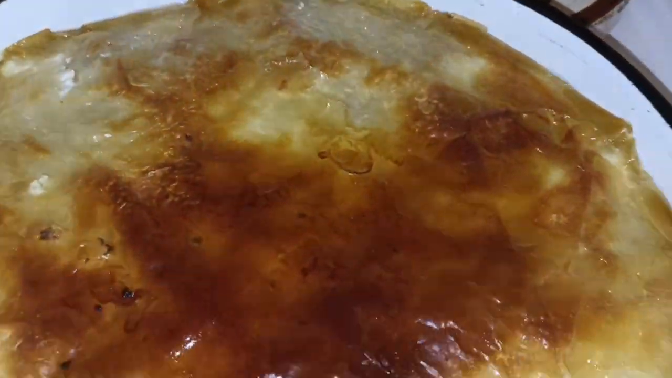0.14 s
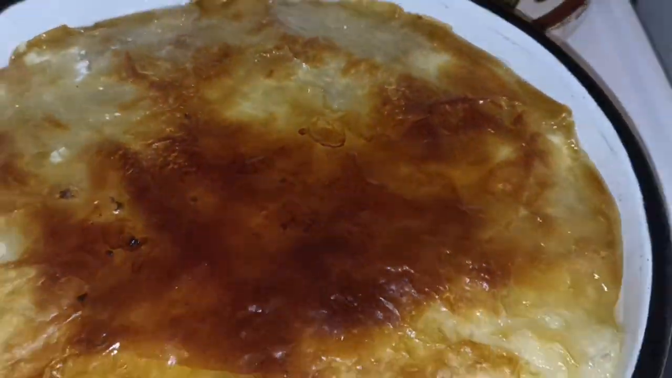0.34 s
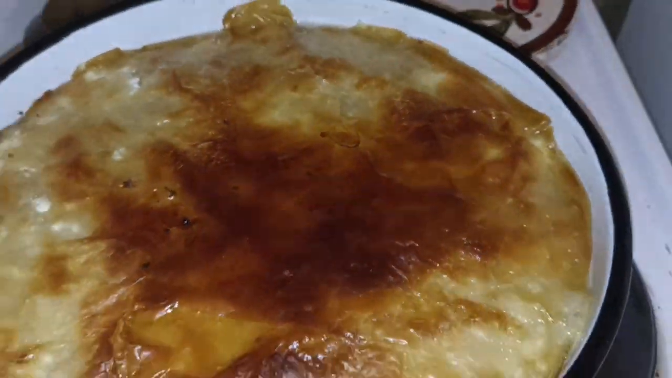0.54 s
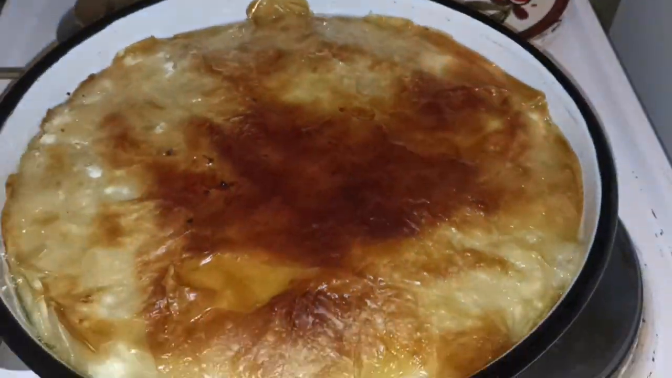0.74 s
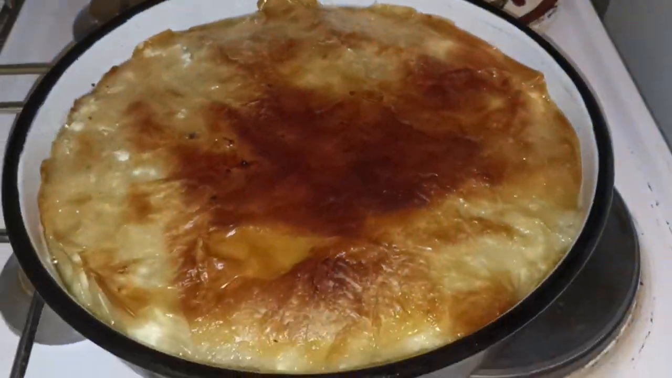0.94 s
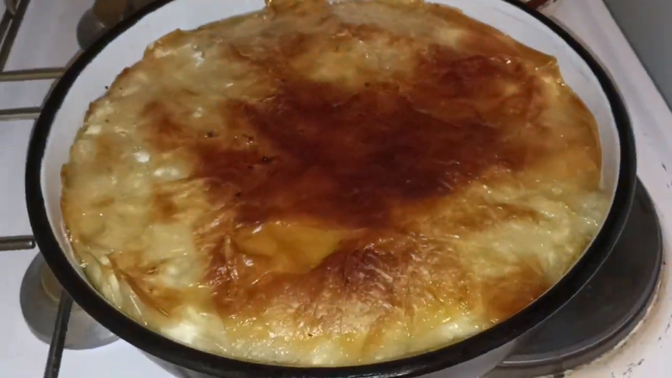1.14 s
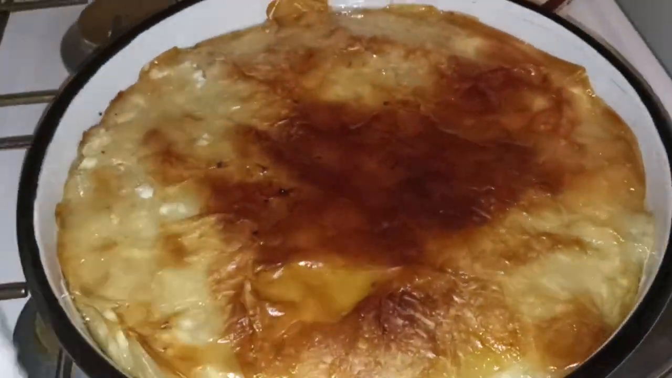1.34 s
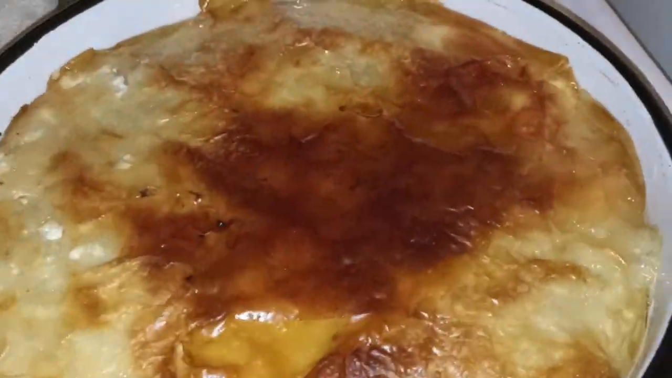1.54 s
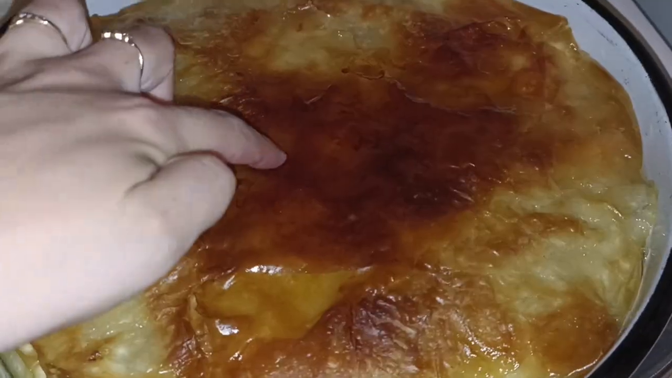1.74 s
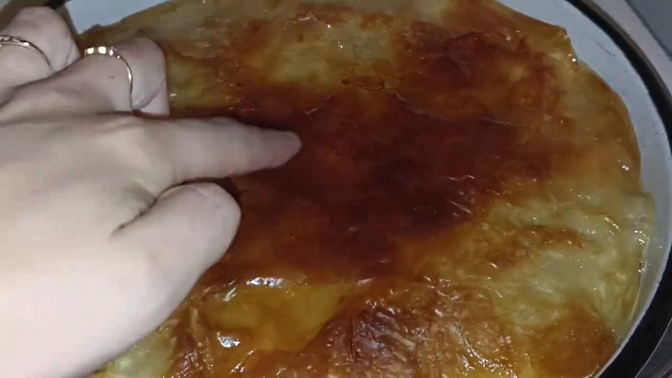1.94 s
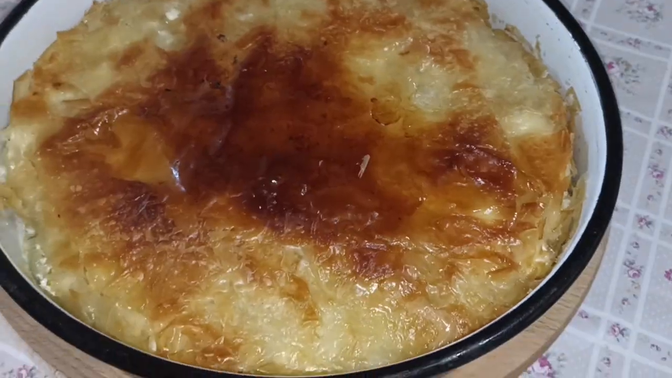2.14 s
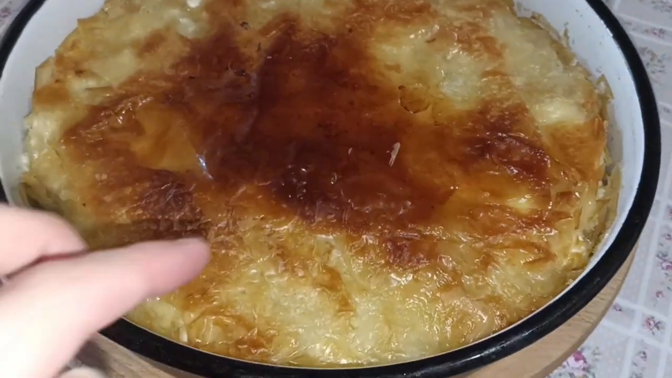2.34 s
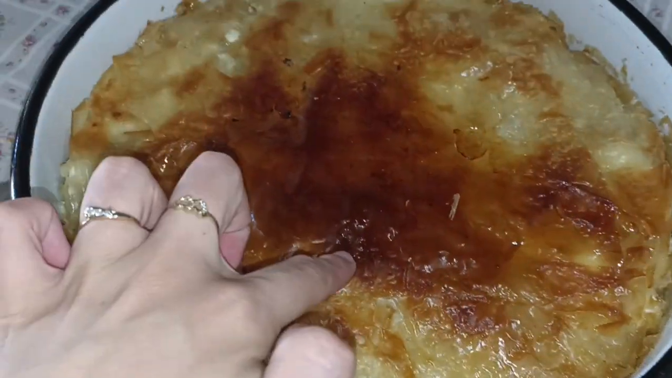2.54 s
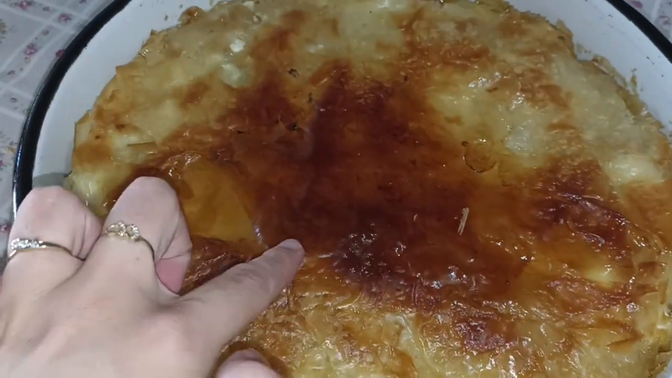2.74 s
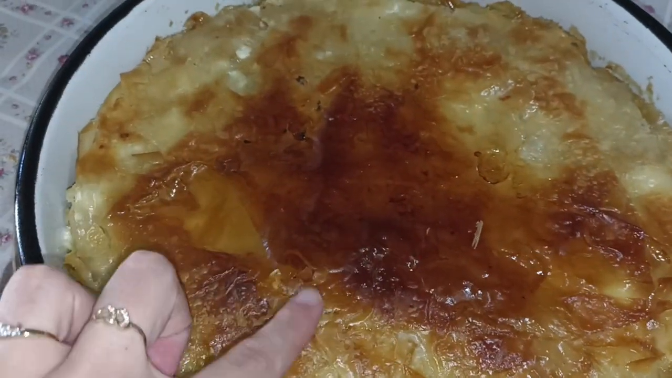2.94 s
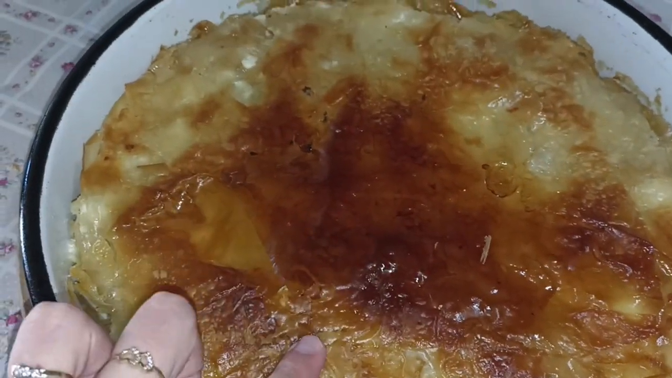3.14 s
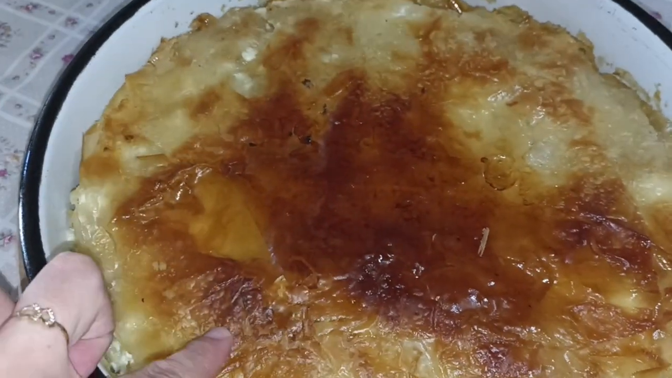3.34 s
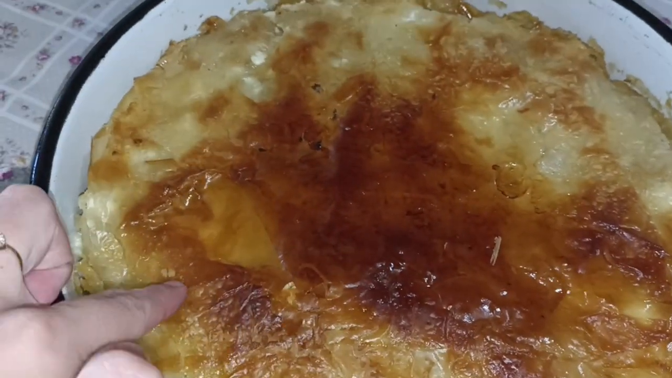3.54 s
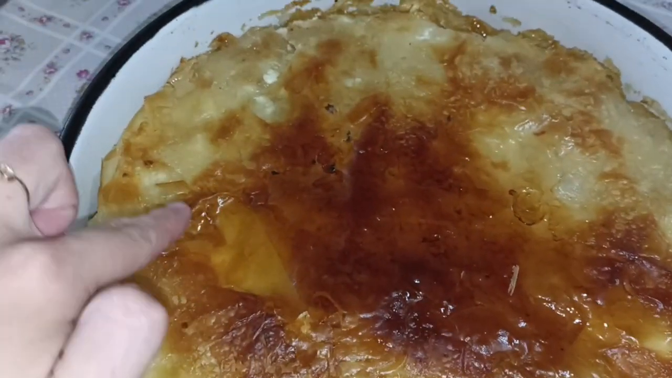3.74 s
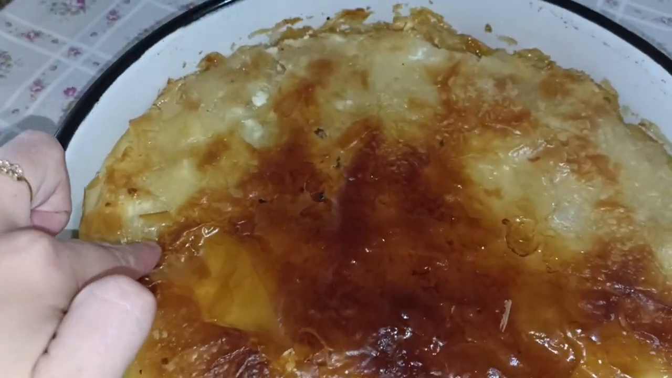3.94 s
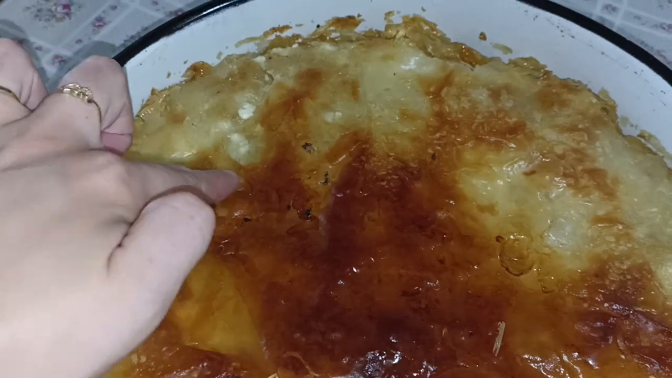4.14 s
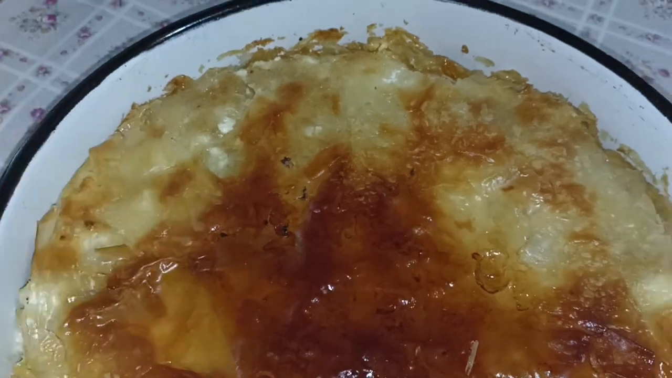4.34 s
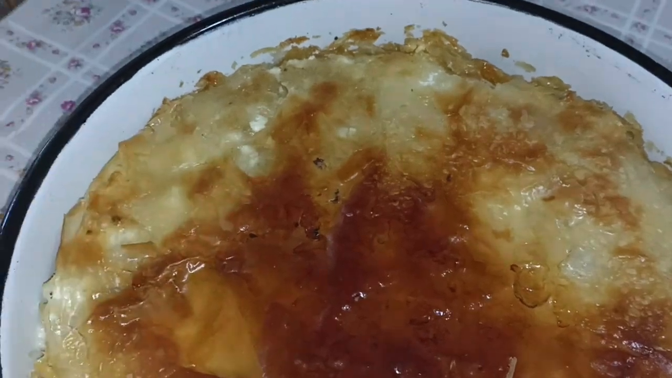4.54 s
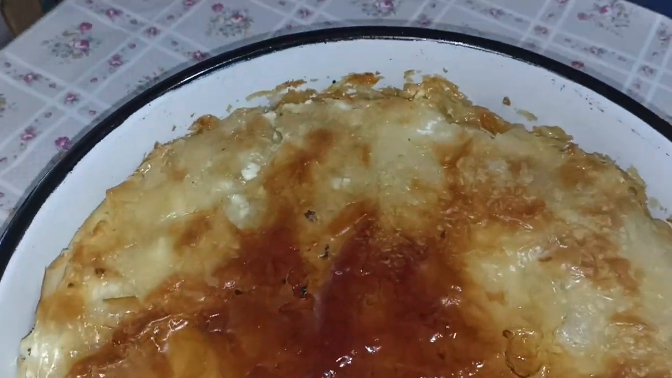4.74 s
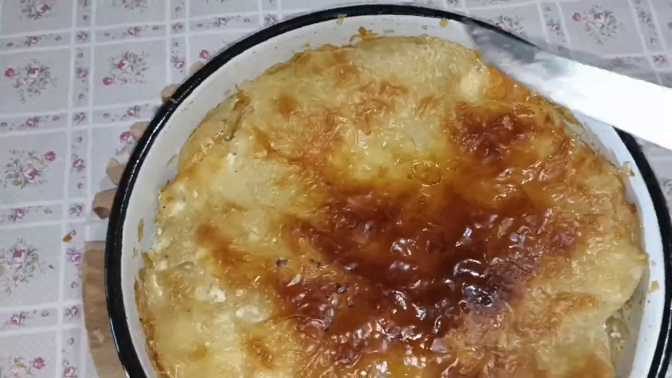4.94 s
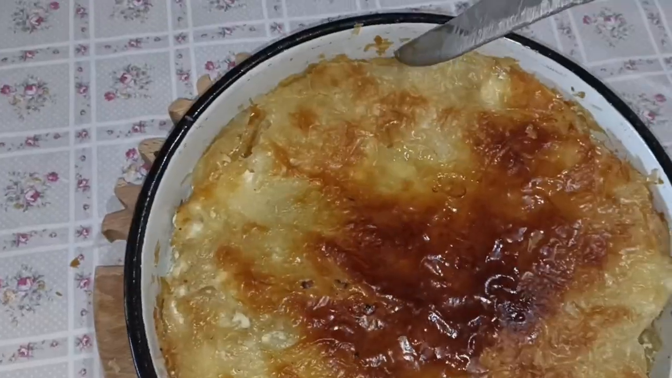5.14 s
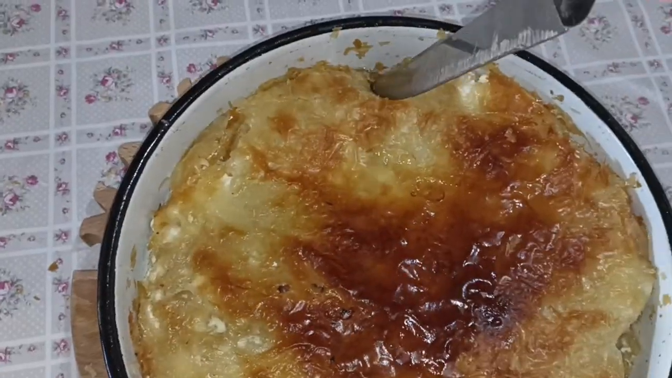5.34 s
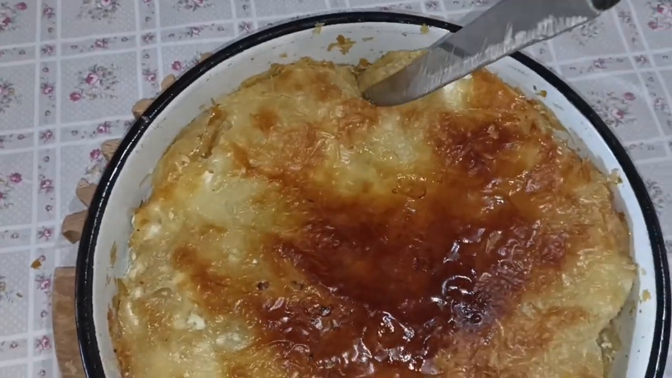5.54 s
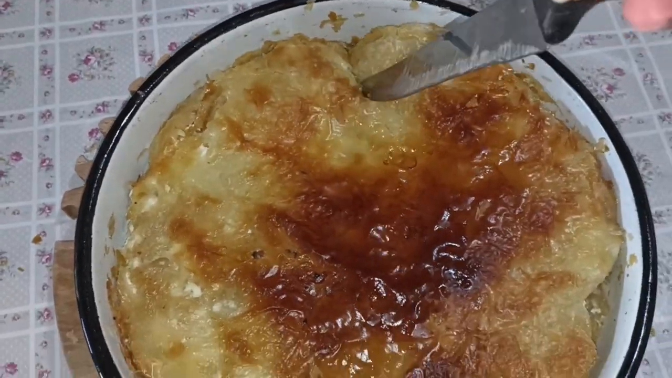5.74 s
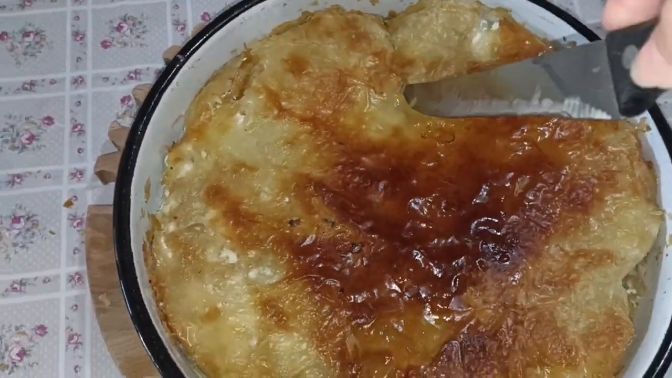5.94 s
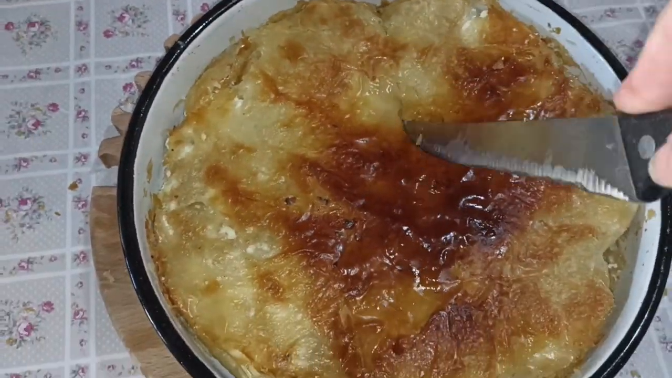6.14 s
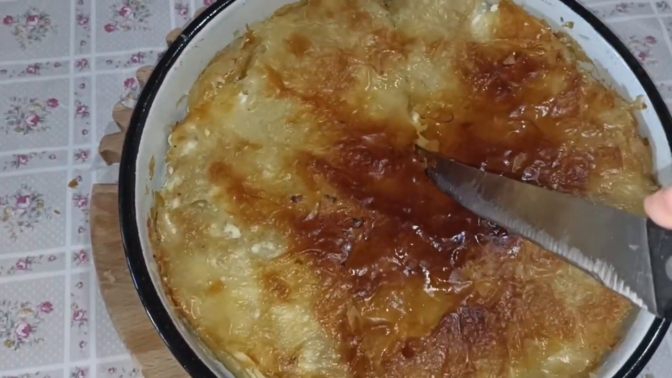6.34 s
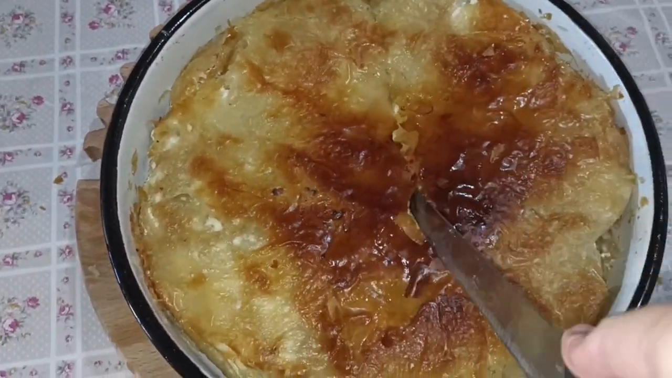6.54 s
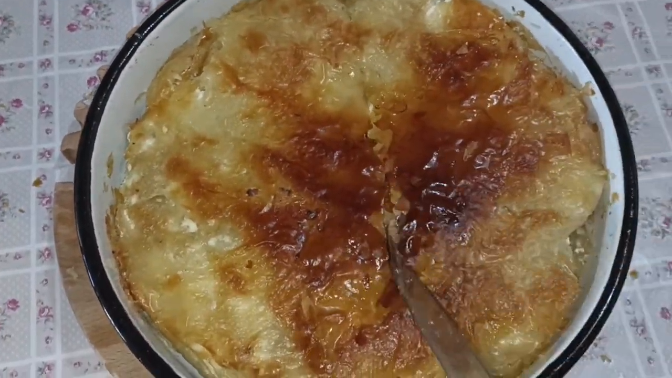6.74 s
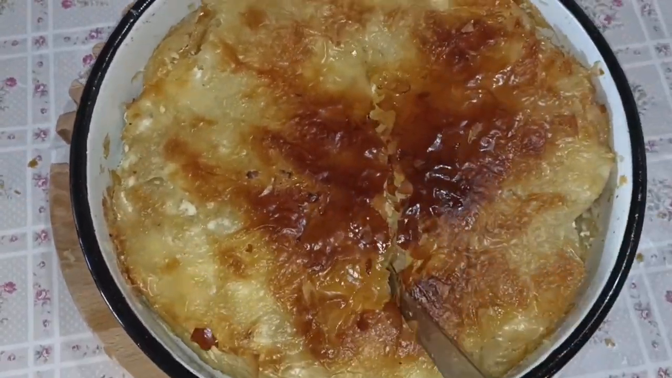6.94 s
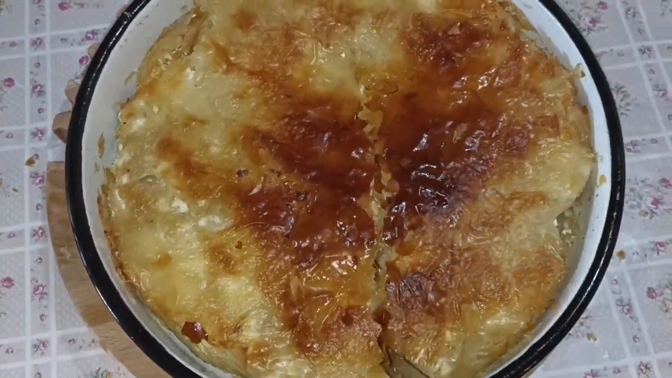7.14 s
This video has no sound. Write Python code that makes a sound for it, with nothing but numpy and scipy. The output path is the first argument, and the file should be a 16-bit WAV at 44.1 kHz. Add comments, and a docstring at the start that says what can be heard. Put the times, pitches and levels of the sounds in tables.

```python
"""Small kitchen, close up: a flaky pastry in an enamel pan. Fat sizzles on the stove for two seconds, as dense noise grains;
then, on the table, a fingertip presses the brittle top and a serrated knife saws through it.
Flakes snap as short noise bursts and crumble in clouds of grains; filters shape the answer of crust and pan.
Blisters pop, the blade scrunches, handling bumps; low room noise runs underneath."""
import sys
import numpy as np
from scipy import signal
from scipy.fft import rfft, irfft, next_fast_len
from scipy.io import wavfile

SR = 44100
rng = np.random.default_rng(int(sys.argv[2]) if len(sys.argv) > 2 else 0)


def persist_wave(psi):
    """Save psi, clipped to +-1, as 16-bit WAV."""
    counts = np.round(np.clip(psi, -1, 1) * 32767).astype(np.int16)
    wavfile.write(sys.argv[1], SR, np.atleast_2d(counts).T)


N = 317520
TIME_S = np.arange(N) / SR
FILTER_TAPS = 1024
STOVE_END_S = 1.988
TOP_HZ = 16100

# steady spectra, relative: pitch_hz, level_db (per Hz)
SIZZLE_SPECTRUM = [(100, -38), (300, -4), (700, 3.5), (1000, -3.5), (2000, 0.5), (3200, 5.5), (5000, -2),
                   (8000, 0), (12000, -1.5), (16000, -6.5)]
KITCHEN_SPECTRUM = [(25, -49.5), (60, -8), (110, 3), (170, -0.5), (270, 0.5), (500, -7.5), (1000, -12.5),
                    (2000, -16.5), (3400, -20), (4200, -27), (8000, -30), (15500, -33.5)]
# fat bubbles that burst loudly: start_s, ring_hz, level_db
SPITS = [(.5185, 11400, -46), (1.2475, 6650, -44.5), (1.426, 6250, -44.5)]
# bumps and rustles of handling and of the pan: start_s, decay_s, pitch_hz, level_db
BUMPS = [(1.325, 0.044, 170, -51), (1.328, 0.028, 820, -55.5), (1.33, 0.032, 2880, -58),
         (1.49, .028, 2800, -61), (1.504, 0.06, 83, -55.5), (1.73, .037, 2780, -60),
         (1.871, 0.047, 78.6, -58), (3.653, 0.01, 193, -44.5), (4.97, 0.05, 2290, -68),
         (6.549, 0.03, 313, -50.5), (6.754, 0.013, 373, -51.5), (7.043, 0.019, 340, -46.5)]
# place being worked: time_s, left_minus_right_db, left_lead_ms, crust_tilt_db_per_octave, flake_tilt_db_per_octave
CONTACT = [(2.6, 0, 0.15, -3, 0.15), (4.2, 4, 0.23, 0.5, -3), (5.2, 2.5, 0.073, -8.5, -1.7),
           (5.8, 3, 0.07, -3, -2.1), (6.2, 2.5, 0.022, -2.5, -1), (6.8, 6.5, 0.0089, 0, -3.2),
           (7.2, 3, 0.023, 0, 2)]
# responses of thin flakes, layered crust and filled pan: pitch_hz, level_db
FLAKE_BODY = [(1800, -18), (2900, 1), (4000, 0.5), (6000, -2), (8000, -1.5), (11000, -1.5), (15500, 2.5)]
CRUST_BODY = [(450, -28), (640, -9.5), (850, -0.5), (1150, 1), (1550, 1), (2700, 6), (4200, -14)]
PAN_BODY = [(40, -25), (150, -12), (280, 1.5), (420, 0), (520, -9.5), (700, -34.5), (2000, -40)]
# fingertip presses, then knife strokes: start_s, length_s, force_db, brittleness_db
# brittleness: flake crackle over crust rasp; below 0 where the knife meets only soft layers
PRESSES = [(2.645, .032, -49, 1), (2.828, 0.05, -41.5, 6.5), (2.9, 0.032, -54, 3.5),
           (3.119, 0.028, -58.5, 10), (3.369, 0.026, -42.5, 12), (3.647, 0.018, -45.5, 5),
           (3.725, .008, -63.5, 10), (3.858, 0.025, -61, 7), (3.884, .044, -47.5, 13),
           (4.139, 0.048, -56, 0)]
STROKES = [(5.173, 0.058, -56, -4.5), (5.267, 0.018, -56.5, -8.5), (5.32, 0.02, -54, -13),
           (5.441, .037, -58.5, 3), (5.498, 0.024, -56, -7), (5.568, 0.025, -48, 1),
           (5.616, 0.017, -52.5, -8), (5.675, 0.037, -53, 3.5), (5.735, 0.017, -59.5, -7),
           (5.78, 0.022, -55, 0.5), (5.83, .07, -60.5, -1.5), (5.977, 0.03, -56.5, 3),
           (6.035, 0.038, -53.5, -7), (6.081, .029, -49.5, 3), (6.174, 0.017, -39, 5.5),
           (6.267, .051, -53, 5), (6.36, 0.021, -43, 5), (6.426, 0.018, -52.5, -21),
           (6.457, 0.052, -52, 3.5), (6.56, 0.03, -52.5, 1), (6.661, 0.02, -43, 10),
           (6.753, 0.026, -47, 10.5), (6.851, .019, -50, 6), (6.944, 0.082, -62, 14), (7.028, .026, -45, 4),
           (7.124, 0.026, -49.5, 2.5), (7.166, 0.04, -47.5, -23)]
# large flakes snapping: start_s, tick_db, knock_db, left_minus_right_db
SNAPS = [(2.6553, -30, -31, -4), (2.8447, -26.5, -41.5, 0), (2.8565, -23.5, -47, 11.5),
         (2.8634, -41, -30, -8), (3.0778, -33, -48, 6), (3.119, -35, -66, 12), (3.1244, -27, -39, 6),
         (3.3350, -32, -44, 3.5), (3.3874, -41, -31.5, -4.5), (3.6298, -26, -33, -1), (3.6536, -20, -23, 1),
         (3.668, -23, -52, 3.5), (3.857, -42.5, -53, 2), (3.8974, -24.5, -41, -3), (3.9212, -30, -37, -3),
         (4.1023, -46, -58, 3), (4.171, -34.5, -41, -3.5), (5.318, -47.5, -60, 11.5),
         (5.3493, -45.5, -53, 10), (5.4374, -45.5, -46, 13), (5.4651, -44.5, -36, 5.5),
         (5.9306, -28, -39.5, 6), (5.9379, -25.5, -41, 9), (5.9863, -32.5, -58, 1),
         (6.083, -30.5, -36.5, -2), (6.143, -33.5, -43, 5), (6.186, -23, -26, 8), (6.2682, -36, -44.5, 6),
         (6.371, -21.5, -29, 7.5), (6.4588, -36.5, -41, 10), (6.5296, -31, -47, 4),
         (6.5982, -32.5, -37.5, 2), (6.6784, -25.5, -32, 2), (6.776, -28, -52, 11),
         (6.8572, -21.5, -33.5, 5), (6.9468, -29, -39.5, 4), (7.047, -27.5, -29, 12),
         (7.0794, -32.5, -67, 24)]
# spells of loose flakes ticking at random: start_s, end_s, tick_db
LOOSE = [(2.846, 4.21, -52), (5.298, 6.105, -52.5), (6.097, 7.15, -45)]
# hollow blisters popping: start_s, cavity_hz, level_db
BLISTERS = [(2.6556, 1900, -41), (2.904, 1400, -41), (3.9867, 4700, -35.5), (4.134, 1360, -39.5),
            (4.1708, 1550, -32.5), (6.1843, 2480, -24.5), (6.7715, 3170, -26.5), (6.8552, 2900, -21.5)]
# blade in the soft inner layers: time_s, resonance_hz, level_db
SCRUNCH = [(5.15, 1080, -70), (5.48, 1210, -54), (5.7, 1160, -56), (5.88, 1250, -64.5), (6.06, 1020, -55),
           (7.2, 1860, -69)]
# response of the two microphone ports: pitch_hz, left_db, right_db
PORTS = [(2730, 0, -0.5), (3540, -2.5, 5.5), (3650, -4, 1.5), (5020, -2.5, 1.5), (6560, -0.5, 8.5),
         (6980, -8, 4.5), (8800, -5, 0.5), (11530, 2.5, -9), (11360, 7, -6), (12940, 9.5, -3),
         (17700, -6, -10)]

# pan thud against force; brittleness jolts it further
FINGER_THUD_DB, KNIFE_THUD_DB, JOLT_DB_PER_DB = -24.5, -5.5, 0.25
# layers sagging after a break: level against the break, decay
SAG_DB, SAG_S = -27, 0.014
# shards during a crunch: tick against crackle, knock against rasp, scatter of level and of pan
SHARD_DB, SHARD_KNOCK_DB, SHARD_SCATTER_DB, SHARD_PAN_DB = 5, -0.5, 1, 2.5
LOOSE_KNOCK_DB = -5  # against the tick
# shards dropping during the sag: span, level against crackle and rasp
AFTER_S, AFTER_DB = 0.032, -10


def undb(db):
    """Decibels to amplitude ratio."""
    return 10 ** (np.asarray(db) / 20)


def unit(x):
    """Scale to rms 1."""
    return x / np.sqrt(np.mean(x ** 2) + 1e-30)


def colour(x, points, tilt_db=0):
    """Minimum-phase filter through (Hz, dB) points, tilted by dB per octave."""
    hz, db = np.transpose(points)
    octave = np.log2(np.maximum(np.fft.rfftfreq(FILTER_TAPS, 1 / SR), 20))
    tilted_db = db + tilt_db * np.log2(hz / hz.mean())
    gain = undb(np.interp(octave, np.log2(hz), tilted_db))
    # fold the cepstrum to make the response causal
    cepstrum = irfft(np.log(gain))
    cepstrum[1:FILTER_TAPS // 2] *= 2
    cepstrum[FILTER_TAPS // 2 + 1:] = 0
    response = irfft(np.exp(rfft(cepstrum)))
    return signal.fftconvolve(np.atleast_2d(x), response[None], axes=1)[:, :x.shape[-1]]


def pair(count, alike):
    """Left and right white noise; alike is the shared fraction of power."""
    alike = np.clip(alike, 0, 1)
    noise = rng.standard_normal((3, count))
    return np.sqrt(alike) * noise[0] + np.sqrt(1 - alike) * noise[1:]


def grains(count, rate_hz, spread_db, decay_s):
    """Envelope of tiny random fractures: many small, a few large."""
    size = undb(spread_db * np.minimum(rng.exponential(size=count), 3.5))
    power = (rng.random(count) < rate_hz / SR) * size ** 2
    decaying = signal.lfilter([1], [1, -np.exp(-1 / (decay_s * SR))], power)
    return unit(np.sqrt(decaying + 1e-12))


def crackle(count, rate_hz, spread_db, decay_s, alike):
    """Tiny bursts of differing pitch: every band gets its own grains, and shared ones span them all."""
    hz = np.fft.rfftfreq(count, 1 / SR)
    band = np.floor(np.sqrt(hz / 330))
    wide = grains(count, rate_hz, spread_db, decay_s)
    spectrum = 0
    for k in np.unique(band):
        envelope = np.hypot(wide / 2, grains(count, rate_hz / 2, spread_db, decay_s))
        spectrum = spectrum + rfft(envelope * pair(count, alike)) * (band == k)
    return unit(irfft(spectrum, count))


def add(out, push, body, start_s, span_s, db, pan_db, lead_ms=0, tilt_db=0):
    """Filter a push through a body and mix it in, with the energy of level db held for span_s."""
    sound = colour(push, body, tilt_db)
    sound *= undb(db) * np.sqrt(span_s * SR / np.sum(sound ** 2, axis=1, keepdims=True))
    side_gains = unit(undb(np.array([pan_db, -pan_db]) / 2))
    for side, delay_s in enumerate([0, lead_ms / 1000]):
        first = int((start_s + delay_s) * SR)
        part = sound[side, :max(N - first, 0)]
        out[side, first:first + len(part)] += side_gains[side] * part


def contact(when_s):
    """Pan dB, lead ms, crust tilt and flake tilt at the place being worked."""
    time_s, *columns = np.transpose(CONTACT)
    return [np.interp(when_s, time_s, column) for column in columns]


def sizzle(start_db=-53, middle_db=-55.0, end_db=-56.5):
    """Dense random bursts of fat bubbles fizz; a few louder ones spit."""
    count = int(STOVE_END_S * SR)
    bubbles = crackle(next_fast_len(count), rate_hz=3000, spread_db=5.5, decay_s=0.00095, alike=0.22)
    fizz = unit(colour(bubbles[:, :count], SIZZLE_SPECTRUM))
    fizz = np.pad(fizz, [(0, 0), (0, N - count)])
    heat_db = np.interp(TIME_S, [.25, .7, 1.7, 2], [start_db, middle_db, middle_db, end_db])
    return fizz * undb(heat_db) + pops(SPITS)


def kitchen(air_db=-62.5, early_db=2.5, rumble_db=-73):
    """Low room noise, easing by early_db, and a rumble mostly at the left port."""
    ease_db = np.interp(TIME_S, [2.1, 3], [early_db, 0])
    air = unit(colour(pair(N, 0.29), KITCHEN_SPECTRUM)) * undb(air_db + ease_db)
    rumble = unit(colour(pair(N, 0), [(25, -25), (100, -1.5), (500, -15), (4000, -86)]))
    side_db = rumble_db + 20 * np.log10([[2], [.5]])
    return air + undb(side_db) * rumble


def pops(table, decay_cycles=0.41, skirt_db=-11):
    """A blister or bubble breaks: a noise burst shorter than one cycle excites its broad cavity resonance."""
    out, t = np.zeros((2, N)), TIME_S[:FILTER_TAPS]
    for start_s, hz, db in table:
        pan_db, lead_ms, _, _ = contact(start_s)
        cavity = [(hz / 4, 4 * skirt_db), (hz / 2, skirt_db), (hz, 0),
                  (hz * 1.5, skirt_db / 2), (hz * 4, 3 * skirt_db)]
        burst = pair(FILTER_TAPS, 0.27) * np.exp(-t * hz / decay_cycles)
        add(out, burst, cavity, start_s, .003, db, pan_db, lead_ms)
    return out


def bumps():
    """Knocks, rumbles and rustles of handling: decaying noise around one pitch."""
    out, t = np.zeros((2, N)), TIME_S[:SR // 2]
    for start_s, decay_s, hz, db in BUMPS:
        body = [(hz / 4, -28), (hz, 0), (hz * 1.55, -4), (hz * 6, -40)]
        add(out, pair(len(t), 0.65) * np.exp(-t / decay_s), body, start_s, decay_s, db, 0)
    return out


def settling(finger_db=-69, knife_db=-56):
    """Loose crumbs tick as sparse grains while finger and knife work."""
    finger = np.interp(TIME_S, [2.6, 2.85, 4, 4.3], [0, 1, 1, 0])
    knife = np.interp(TIME_S, [5.1, 5.9, 6.2], [0, .3, 1])
    crumbs = crackle(N, rate_hz=450, spread_db=4.5, decay_s=.0012, alike=.6)
    level = undb(finger_db) * finger + undb(knife_db) * knife
    return unit(colour(crumbs, FLAKE_BODY, -1.5)) * level


def crunches():
    """Force and brittleness of each press and stroke give (start_s, length_s, crackle_db, rasp_db, thud_db)."""
    rows = []
    for table, thud_db in [(PRESSES, FINGER_THUD_DB), (STROKES, KNIFE_THUD_DB)]:
        for start_s, length_s, force_db, brittle_db in table:
            pan_thud_db = force_db + thud_db + JOLT_DB_PER_DB * brittle_db
            rows.append((start_s, length_s, force_db + brittle_db, force_db, pan_thud_db))
    return rows


def crumbles(rise_s=0.0031, fall_s=0.0041):
    """Layers give way in dense clouds of small fractures that shake crust and pan, then sag."""
    out, t = np.zeros((2, N)), TIME_S[:8 * FILTER_TAPS]
    for start_s, length_s, crackle_db, rasp_db, thud_db in crunches():
        pan_db, lead_ms, crust_tilt, flake_tilt = contact(start_s)
        length_s = max(length_s, rise_s)
        after_s = np.maximum(t - length_s + fall_s / 2, 0)
        release = np.exp(-after_s / fall_s) + undb(SAG_DB) * np.exp(-after_s / SAG_S)
        pressure = (1 - np.exp(-t / rise_s)) * release
        cracks = pressure * crackle(len(t), rate_hz=1400, spread_db=4.8, decay_s=.0006, alike=.5)
        add(out, cracks, FLAKE_BODY, start_s, length_s, crackle_db, pan_db, lead_ms, flake_tilt)
        add(out, cracks, CRUST_BODY, start_s, length_s, rasp_db, pan_db, lead_ms, crust_tilt)
        add(out, pressure * pair(len(t), 0.89), PAN_BODY, start_s, length_s, thud_db, 0)
    return out


def vary(body, spread_db):
    """No two flakes have the same shape: scatter the response levels."""
    hz, db = np.transpose(body)
    return np.column_stack([hz, db + spread_db * rng.standard_normal(len(hz))])


def small_flakes(crunch_count=3, sag_count=2, loose_count=14):
    """Shards break unevenly through each crunch and its sag, loose flakes tick in spells; columns as in SNAPS."""
    spells = [(start_s, end_s - start_s, db, db + LOOSE_KNOCK_DB, loose_count)
              for start_s, end_s, db in LOOSE]
    for start_s, length_s, crackle_db, rasp_db, _ in crunches():
        spells.append((start_s, length_s, crackle_db + SHARD_DB, rasp_db + SHARD_KNOCK_DB, crunch_count))
        spells.append((start_s + length_s, AFTER_S, crackle_db + AFTER_DB, rasp_db + AFTER_DB, sag_count))
    rows = []
    for start_s, length_s, tick_db, knock_db, count in spells:
        for k in range(count):
            when_s = start_s + length_s * (k + rng.random()) / count
            level_db, pan_db = rng.standard_normal(2) * [SHARD_SCATTER_DB, SHARD_PAN_DB]
            rows.append((when_s, tick_db + level_db, knock_db + level_db, contact(when_s)[0] + pan_db))
    return rows


def snaps(tick_s=0.00057, knock_s=0.001, splinter_s=0.0033, splinter_db=-18, thud_db=-17,
          span_s=0.0022, strain_s=0.0039, strain_db=-17):
    """Each flake crackles under strain, breaks in about a millisecond, sheds splinters and knocks crust and pan."""
    out = np.zeros((2, N))
    early_s = FILTER_TAPS / 2 / SR
    t = TIME_S[:2 * FILTER_TAPS] - early_s  # break at t = 0
    strain = undb(strain_db) * np.exp(-abs(t) / strain_s)
    splinters = undb(splinter_db) * np.exp(-abs(t) / splinter_s)
    tick_shape = np.where(t < 0, strain, np.exp(-abs(t) / tick_s) + splinters)
    knock_shape = np.where(t < 0, strain, np.exp(-abs(t) / knock_s) + splinters)
    for start_s, tick_db, knock_db, pan_db in SNAPS + small_flakes():
        _, lead_ms, crust_tilt, flake_tilt = contact(start_s)
        first_s = start_s - early_s
        tick = pair(len(t), 0.48) * tick_shape
        knock = pair(len(t), 1.0) * knock_shape
        add(out, tick, vary(FLAKE_BODY, 0.63), first_s, span_s, tick_db, pan_db, lead_ms, flake_tilt)
        add(out, knock, vary(CRUST_BODY, 2), first_s, span_s, knock_db, pan_db, lead_ms, crust_tilt)
        add(out, knock, PAN_BODY, first_s, span_s, knock_db + thud_db, 0)
    return out


def scrunch(width_hz=230):
    """Teeth catch and slip in the layers, exciting a broad resonance that shifts as the blade moves."""
    time_s, *columns = np.transpose(SCRUNCH)
    hz, db = (np.interp(TIME_S, time_s, column) for column in columns)
    slips = pair(N, 0.37) * grains(N, rate_hz=250, spread_db=8.0, decay_s=0.0025)
    # shift the resonance to 0 Hz, low-pass, shift back
    turn = np.exp(2j * np.pi * np.cumsum(hz) / SR)
    lowpass = signal.butter(2, width_hz, fs=SR, output="sos")
    ring = signal.sosfilt(lowpass, slips / turn) * turn
    return unit(ring.real) * undb(db) * (TIME_S > time_s[0])


def room(x, near_db=-14, near_s=0.0097, tail_db=-21, t60_s=0.2, tail_tilt_db=-0.5):
    """Quick reflections from pan and table, then the short tail of the kitchen, as decaying noise."""
    t = TIME_S[:SR // 2]
    near = pair(len(t), 0.28) * np.exp(-t / near_s) * (t > .0015)
    tail = pair(len(t), 0.068) * undb(-60 * t / t60_s) * (t > .008)
    tail = colour(tail, [(200, 0), (3000, 4), (16000, -6.0)], tail_tilt_db)
    response = (undb(near_db) * unit(near) + undb(tail_db) * unit(tail)) / np.sqrt(len(t))
    return x + signal.fftconvolve(x, response, axes=1)[:, :N]


def scene():
    """Sizzle first, then finger and knife, over the quiet kitchen."""
    pastry = snaps() + pops(BLISTERS) + crumbles() + settling() + scrunch()
    return room(pastry + bumps()) + sizzle() + kitchen()


def record(dry):
    """Each port colours its channel; a low-pass cuts the top."""
    ports = np.array(PORTS)
    heard = np.vstack([colour(dry[side], ports[:, [0, side + 1]]) for side in range(2)])
    lowpass = signal.ellip(10, .2, 70, TOP_HZ, fs=SR, output="sos")
    return signal.sosfilt(lowpass, heard)


dry = scene()
out = record(dry)
persist_wave(out)
```